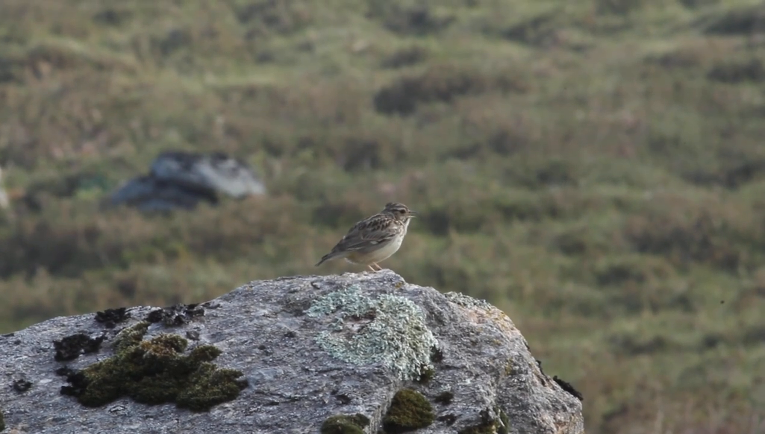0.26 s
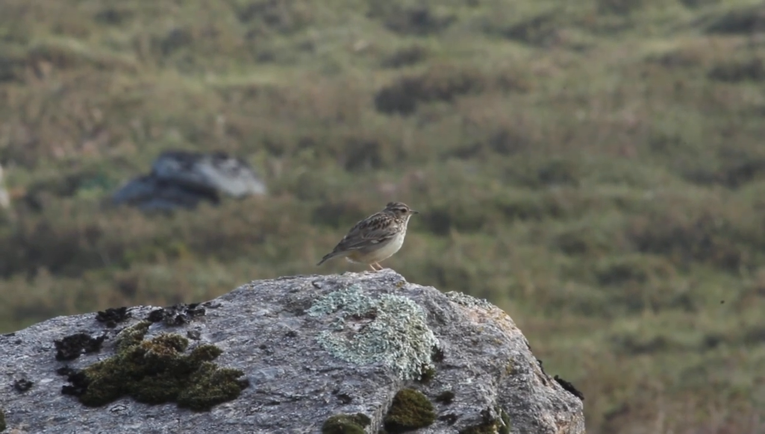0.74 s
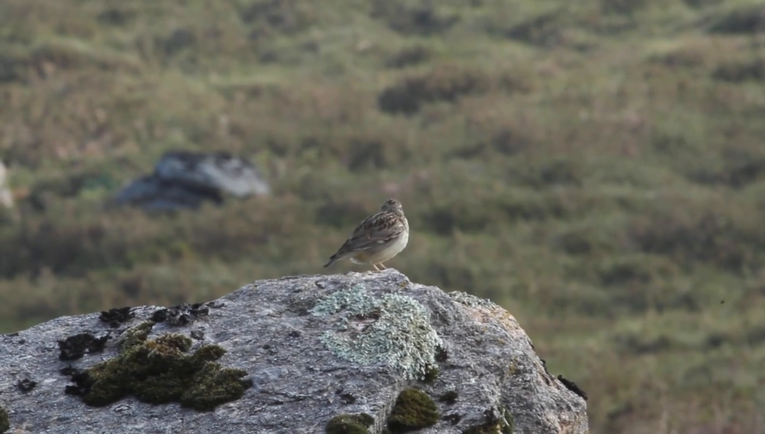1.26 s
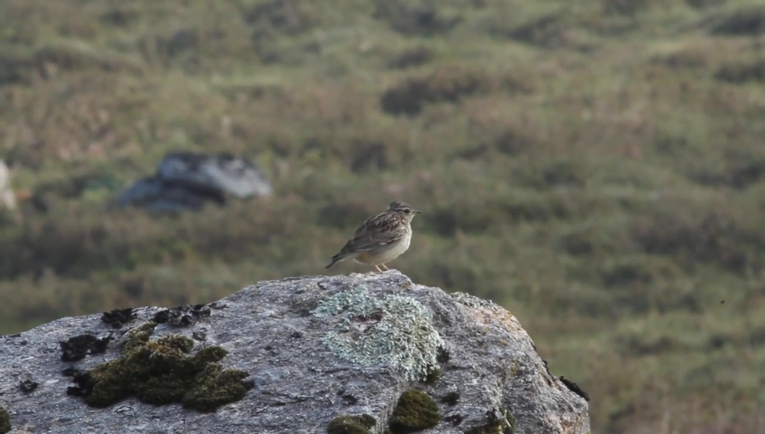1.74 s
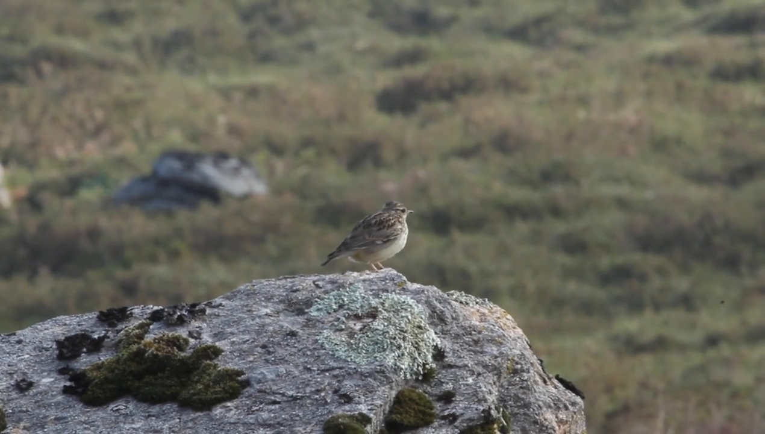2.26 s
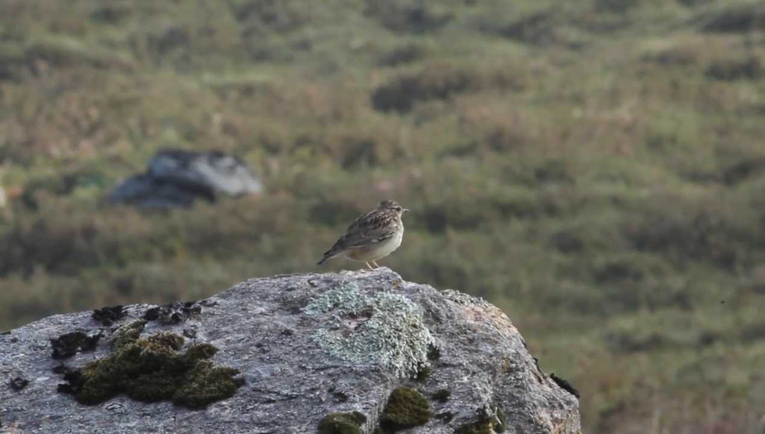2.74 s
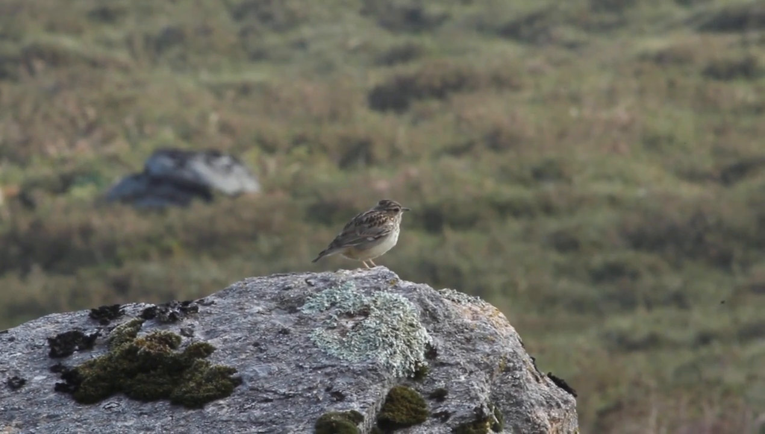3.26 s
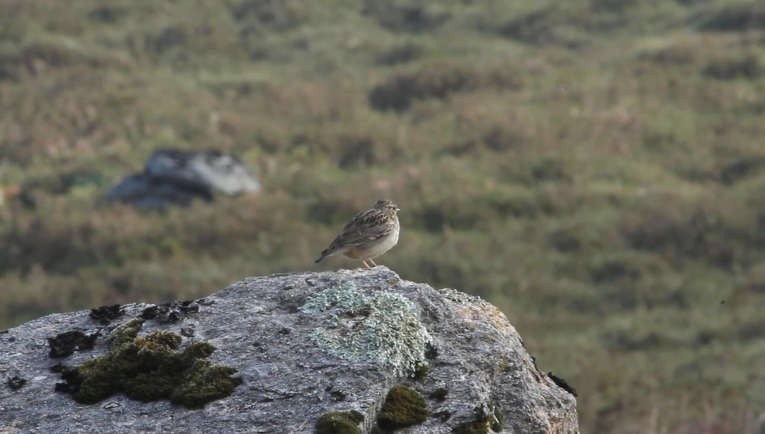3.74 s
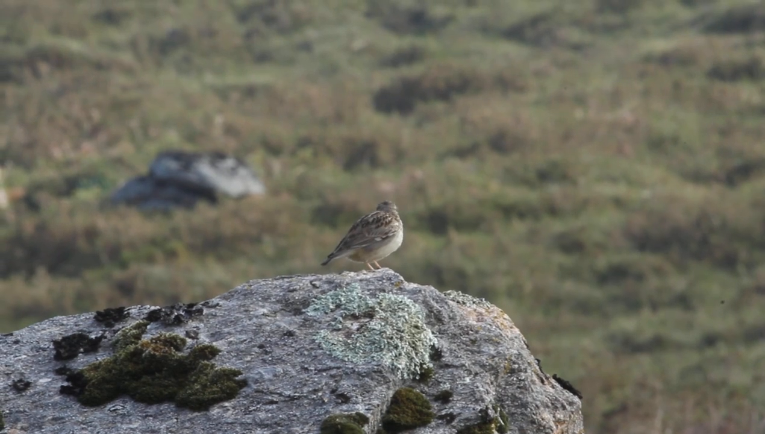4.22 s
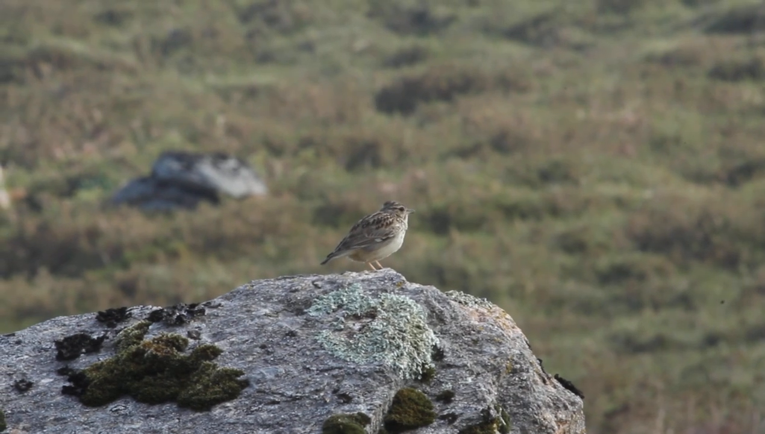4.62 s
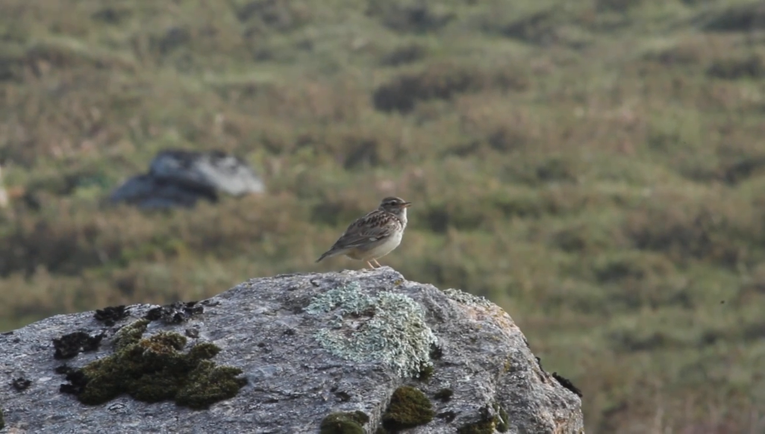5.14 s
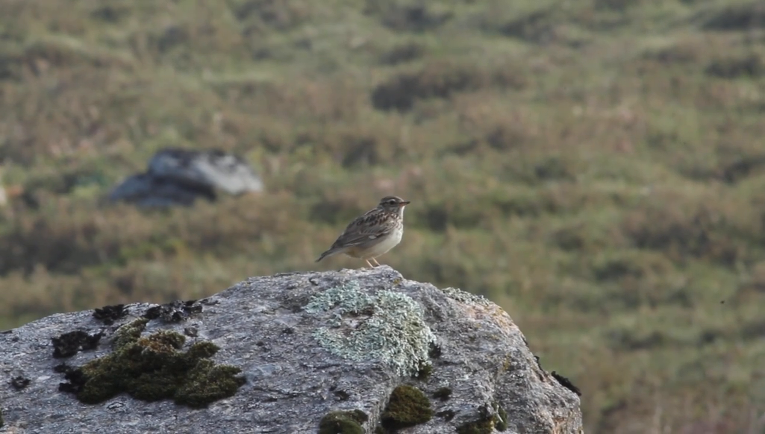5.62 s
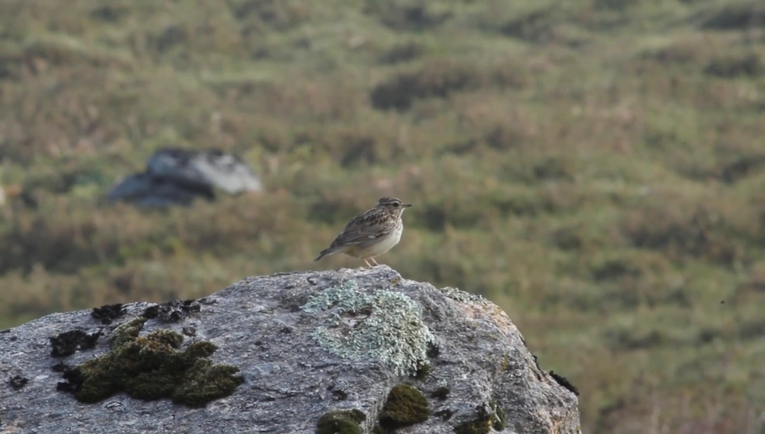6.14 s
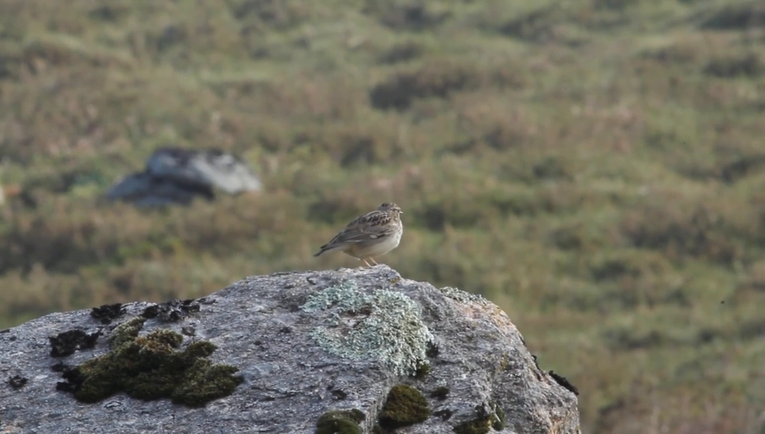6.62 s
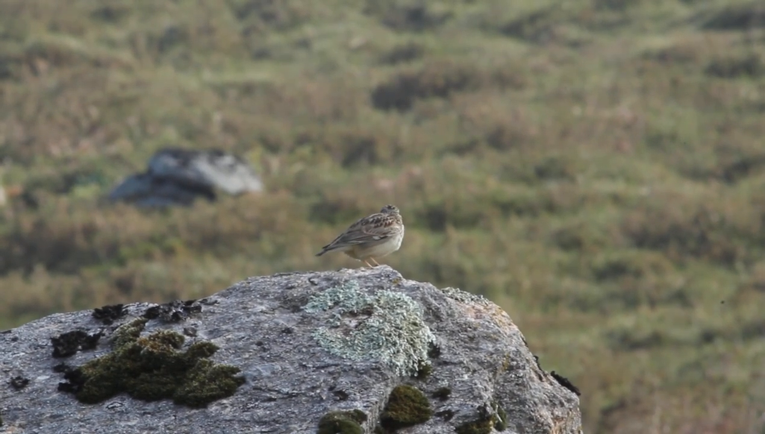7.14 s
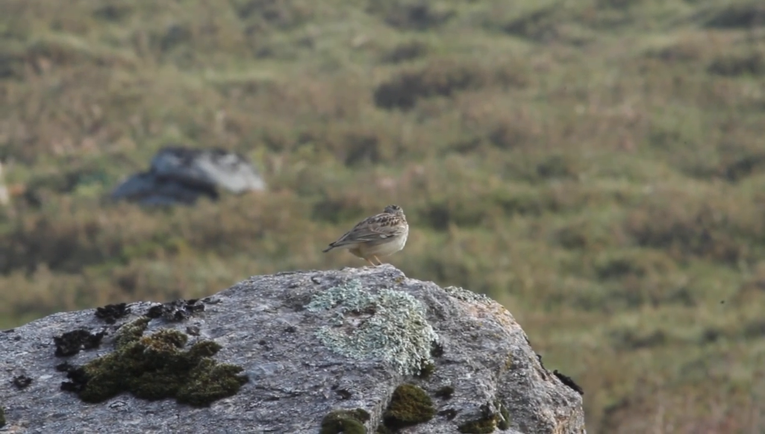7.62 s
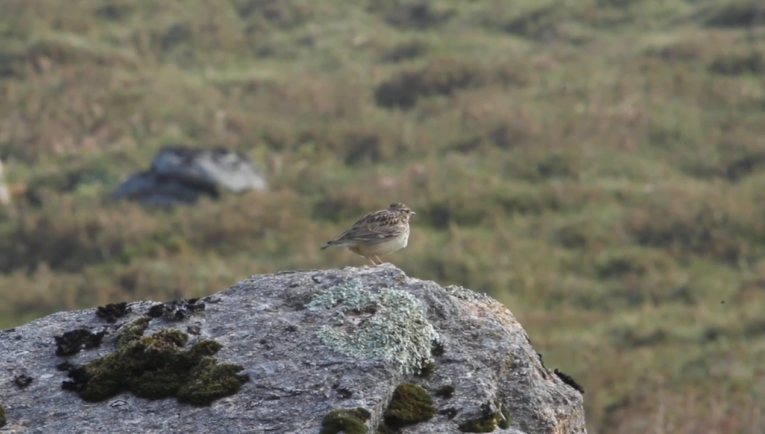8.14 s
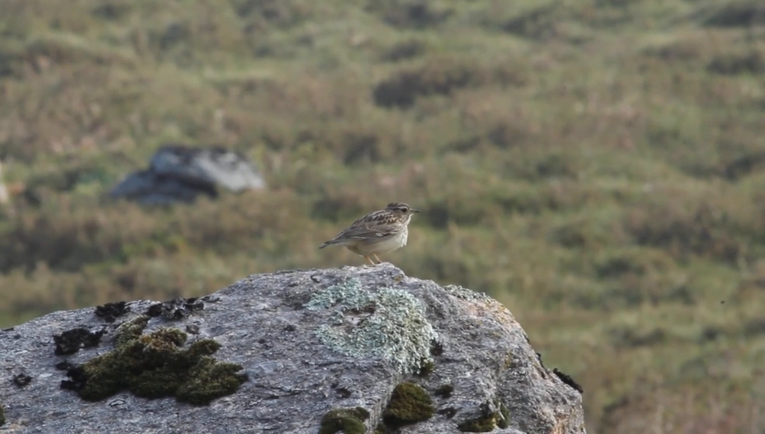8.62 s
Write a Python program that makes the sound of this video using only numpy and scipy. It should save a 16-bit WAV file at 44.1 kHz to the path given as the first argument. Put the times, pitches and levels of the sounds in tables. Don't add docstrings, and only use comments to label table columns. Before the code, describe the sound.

On an open hillside a lark sings three clear whistled syllables, each flicking upward, holding and dropping off. After a pause with tiny far twitters and a neighbour's quick rising calls, it sings seven falling warbles that grow louder and sink in pitch. Faint calls follow. Rock and slope return a light echo. Close to the microphone, the camera drive hums low and rattles unevenly with small knocks, over soft hiss.

```python
import sys
import numpy as np
from scipy import signal
from scipy.fft import rfft, irfft
from scipy.io import wavfile
from scipy.ndimage import uniform_filter1d

SR = 44100
rng = np.random.default_rng(int(sys.argv[2]) if len(sys.argv) > 2 else 0)


def bounce(signal):
    frames = np.transpose(np.atleast_2d(signal))
    limited = np.clip(frames, -1, 1)
    pcm = np.round(limited * 32767).astype(np.int16)
    wavfile.write(sys.argv[1], SR, pcm)


def nominal_scale(level):
    x = np.asarray(level, float) / 20
    return 10 ** x


N = 391158


def level(x, db):
    return x * nominal_scale(db) / np.sqrt(np.mean(x ** 2))


def track(rows):
    return np.interp(np.arange(N) / SR, *np.transpose(rows))


def ring(x, hz, width):
    return signal.lfilter(*signal.iirpeak(hz, hz / width, fs=SR), x)


def walk(rate):
    k = int(SR / rate)
    steps = np.repeat(rng.standard_normal(N // k + 1), k)
    return 1.093 * uniform_filter1d(uniform_filter1d(steps, k), k)[:N]


def add(out, start_s, hz, db, shape, overtones):
    full_voice_db = -24
    phase = 2 * np.pi * np.cumsum(hz) / SR
    tone = np.sin(phase)
    for k, part_db, loss in overtones:
        tone = tone + nominal_scale(part_db + loss * (db - full_voice_db)) * np.sin(k * phase)
    i = int(start_s * SR)
    out[i:i + len(hz)] += (np.sqrt(2) * nominal_scale(db) * shape * tone)[:N - i]


def bent(rows, midway):
    return [(s, length_s, a, a + midway * (b - a), b, db) for s, length_s, a, b, db in rows]


def glides(rows, edge, overtones, hold=0):
    out = np.zeros(N)
    for start_s, length_s, *hz, db in rows:
        u = np.linspace(0, 1, int(length_s * (1 + hold) * SR))
        curve = np.polyfit([0, .5, 1], hz, 2)
        pitch = np.polyval(curve, np.minimum(u * (1 + hold), 1 - hold / 2))
        shape = np.sin(np.pi * u ** edge[0]) ** edge[1]
        add(out, start_s, pitch, db, shape, overtones)
    return out


def lark():
    # start t/s, length/s, f/Hz at start, f/Hz at end, level/dB
    lead_in = [
        (0, 0.037, 2340, 2270, -48.5),
        (.262, 0.047, 2215, 2310, -52),
        (.545, .044, 2090, 2170, -48.5),
    ]
    side = glides(bent(lead_in, 0.72), (1.1, .9), []) + spurs(np.zeros(N))
    voice = side + hooks(np.zeros(N)) + warbles(np.zeros(N))
    throat_hz, throat_width, throat_db = 5600, 500, -1
    throat = ring(ring(voice, throat_hz, throat_width), throat_hz, throat_width)
    voice = voice + nominal_scale(throat_db) * throat
    return voice * nominal_scale(.5 * walk(220) + .2 * walk(90))


def sing(out, t, hz, db):
    # multiple of the pitch, level/dB at full voice, extra dB lost per dB sung softer
    overtones = [
        (2, -45, -.4),
        (3, -39, 1.1),
    ]
    hz, db = (uniform_filter1d(c, size=70, mode="nearest") for c in (hz, db))
    shape = signal.windows.tukey(len(t), 0.0034 / (t[-1] - t[0]))
    add(out, t[0], hz, db, shape, overtones)


def hooks(out):
    # voice break t/s, held f/Hz, flick f/Hz, level/dB, effort sag/dB
    syllables = [
        (.093, 3420, 4220, -30, -0.5),
        (0.367, 3407, 4480, -29.5, -2),
        (.65, 3302, 4420, -30.5, -6),
    ]
    # t/s from break, f/Hz, level/dB relative to syllable, share of sag
    run_up = [(-.055, 2420, -27, 0.014), (-.051, 2640, -14, 0.17), (-.046, 2790, -13, .7),
              (-.034, 3050, -4, 0.79), (-.022, 3230, -5, 0.043), (-.01, 3340, -0.5, .1),
              (-.004, 3520, -0.5, 0.41), (0, 3280, -1, 0.039)]
    # t/s from break, pitch over held pitch, level/dB relative to syllable, share of sag
    settle = [(.013, 1.16, 2.5, .8), (.025, 1.08, 0, 1.1), (.039, 1.03, -4, 0.96), (.062, 1.001, -5, 0.53),
              (0.089, 1.005, -2.5, 0.47), (.1125, 1.066, .1, -0.18), (0.115, 0.99, -7, 0),
              (.119, 0.886, -8.5, 0.12), (0.1235, 0.76, -30, 0.096)]
    catch_s, catch_hz, catch_db = 0.00243, 3330, -19
    flick_s, flick_db = 0.0084, 5
    for s, held_hz, flick_hz, db, sag_db in syllables:
        after = [(0, catch_hz, catch_db, 0), (catch_s, catch_hz, catch_db, 0), (flick_s, flick_hz, flick_db, 1.2)]
        after += [(a, ratio * held_hz, c, d) for a, ratio, c, d in settle]
        for rows in run_up, after:
            at, hz, relative_db, share = np.transpose(rows)
            t = np.arange(at[0], at[-1], 1 / SR)
            effort = db + np.interp(t, at, relative_db + share * sag_db)
            sing(out, s + t, np.interp(t, at, hz), effort)
    return out


def warbles(out):
    # t/s, shoulder f/Hz, level/dB, bend of the climb
    starts = [(3.775, 3550, -61, 0.99), (4.055, 3780, -50, .55), (4.328, 3460, -49.5, 1.2),
              (4.582, 3360, -40.5, 1.3), (4.85, 3250, -43, 1.51), (5.12, 3200, -38.5, 2),
              (5.396, 3150, -35, 3.2)]
    # t/s, f/Hz, loudest this much later/s, level/dB
    crests = [(3.83, 4200, .02, -44), (4.107, 4300, 0.018, -41.5), (4.385, 3930, .012, -36),
              (4.651, 3674, 0.017, -32.5), (4.918, 3574, 0.014, -30.5), (5.192, 3504, 0.003, -23),
              (5.477, 3560, 0.006, -24)]
    # t/s, f/Hz, faintest this much earlier/s, level/dB
    troughs = [(3.897, 3490, 0.03, -62), (4.173, 3400, 0.023, -63), (4.461, 2955, 0.023, -51.5),
               (4.725, 2886, .004, -57), (4.993, 2776, 0.015, -51.5), (5.266, 2734, 0.0069, -45),
               (5.555, 2653, 0.0071, -51)]
    # t/s, f/Hz, loudest this much earlier/s, level/dB, bend of the upturn
    tops = [(3.933, 4060, 0.017, -44, 1.8), (4.204, 3600, 0.016, -39, 2), (4.509, 3330, 0.025, -33, 1.6),
            (4.776, 3270, 0.013, -32, 3), (5.052, 3126, 0.022, -36, 1.44),
            (5.322, 3134, 0.0035, -26.5, 2.7), (5.607, 3003, 0.0082, -28.5, 1.02)]
    fall = [(0, 0.022), (.1, 0.078), (.28, .37), (.67, .82), (.87, .97), (1, 0.98)]
    scoop_s, scoop_from, scoop_db = .009, .6, -17
    fade_db_s, release_s, release_db, fail_bend = 300, 0.016, -17, 1.1
    swell_share = 0.68
    for k, (start, crest, trough, top) in enumerate(zip(starts, crests, troughs, tops)):
        start_s, shoulder_hz, start_db, climb_bend = start
        crest_s, crest_hz, loud_later_s, crest_db = crest
        trough_s, trough_hz, faint_earlier_s, trough_db = trough
        top_s, top_hz, loud_earlier_s, top_db, upturn_bend = top
        shoulder_s = start_s + scoop_s
        t = np.arange(start_s if k else shoulder_s, top_s + release_s, 1 / SR)

        def done(a, b):
            return np.clip((t - a) / (b - a), 0, 1)

        hz = shoulder_hz * (1 - (1 - scoop_from) * (1 - done(start_s, shoulder_s)) ** 1.31)
        hz += (crest_hz - shoulder_hz) * done(shoulder_s, crest_s) ** climb_bend
        hz += (trough_hz - crest_hz) * np.interp(done(crest_s, trough_s), *np.transpose(fall))
        hz += (top_hz - trough_hz) * done(trough_s, top_s) ** upturn_bend

        loud_s, faint_s = crest_s + loud_later_s, trough_s - faint_earlier_s
        upturn_db = top_db + start_db - trough_db
        end_db = upturn_db - fade_db_s * loud_earlier_s
        effort = [(start_s, start_db + scoop_db), (shoulder_s, start_db), (loud_s, start_db), (faint_s, start_db),
                  (top_s - loud_earlier_s, upturn_db), (top_s, end_db), (top_s + release_s, end_db + release_db)]
        failing = done(loud_s, faint_s) ** fail_bend
        swell = done(shoulder_s, loud_s) ** (max(climb_bend, 1) ** swell_share) - failing
        db = np.interp(t, *np.transpose(effort))
        db = db + (crest_db - start_db) * swell + (trough_db - start_db) * failing
        sing(out, t, hz, db)
    return out


def spurs(out):
    # t/s, level/dB
    times = [
        (4.578, -57),
        (4.841, -52),
        (5.114, -51),
        (5.388, -49.5),
    ]
    length_s, held_hz, rise_hz, bend = .014, 3660, 1150, 5.6
    u = np.linspace(0, 1, int(length_s * SR))
    for s, db in times:
        add(out, s, held_hz + rise_hz * u ** bend, db, np.sin(np.pi * u ** 0.92) ** .6, [])
    return out


def neighbour():
    # start t/s, length/s, top f/Hz, level/dB
    answers = [(3.123, 0.022, 3180, -44), (3.214, 0.023, 3140, -45.5), (3.306, .03, 3400, -47.5),
               (3.393, 0.027, 3200, -49), (6.715, 0.022, 3200, -51), (6.798, 0.025, 3170, -49.5),
               (7.438, .024, 3070, -55.4), (7.528, 0.026, 3220, -49.5), (7.616, 0.03, 3380, -47.5),
               (7.71, 0.027, 3080, -47.5), (7.8, 0.027, 3090, -46.5), (8.682, 0.02, 2300, -53),
               (8.754, .018, 2210, -55), (8.83, 0.019, 2280, -53.5)]
    sweep_per_s, sweep_midway = 15.2, 0.63
    perch_up_s, notch_hz, notch_width = 4, 2830, 320
    rows = [(s, length_s, hz * (1 - sweep_per_s * length_s), hz, db) for s, length_s, hz, db in answers]
    calls = glides(bent(rows, sweep_midway), (1.3, .55), [(2, -24, 0)], hold=.13)
    calls = calls * nominal_scale(1.8 * walk(260))
    low = np.arange(N) < perch_up_s * SR
    calls = calls - .85 * low * ring(calls, notch_hz, notch_width)
    return calls + nominal_scale(-17) * np.roll(calls, int(.011 * SR))


def twitter():
    # start t/s, length/s, f/Hz at start, f/Hz at end, level/dB
    chirps = [(0, .022, 3720, 3600, -57), (.03, .033, 3720, 3620, -58), (.029, 0.0099, 3000, 2600, -51),
              (.132, .016, 5830, 6050, -66), (.193, 0.033, 4860, 4820, -62), (.575, .035, 5790, 5800, -68),
              (.87, .035, 6050, 6240, -67), (1.365, .035, 5480, 5350, -68), (1.43, .035, 5180, 5100, -71),
              (1.575, .017, 4700, 5020, -66.5), (1.84, 0.028, 4860, 4530, -68),
              (1.865, .014, 4680, 5000, -64), (6.13, .032, 3920, 3980, -66), (6.23, .084, 4900, 4300, -63),
              (6.312, .026, 5750, 4940, -60), (6.278, 0.042, 6750, 5700, -65),
              (6.325, .05, 4660, 4300, -65), (6.378, .032, 6020, 6960, -66), (6.478, .015, 4390, 4370, -64),
              (6.503, .017, 3920, 3490, -61), (6.57, .024, 5990, 6550, -69),
              (6.755, .048, 4160, 3600, -61.5), (7.948, .036, 4280, 4040, -67),
              (8.688, .014, 3640, 4430, -63)]
    return glides(bent(chirps, 0.89), (1.0, .7), [])


def hillside(x):
    # delay t/s, level/dB
    echoes = [
        (.0021, -22),
        (.0085, -21),
        (.0148, -16.5),
        (.0162, -22),
        (.0275, -26),
    ]
    slope_t60_s, slope_db = .6, -24.5
    bank_s, bank_spread_s, bank_db = .066, .016, -27
    t = np.arange(SR // 2) / SR
    scatter = rng.standard_normal((2, len(t))) * (rng.random((2, len(t))) < 240 / SR)
    slope = scatter[0] * nominal_scale(-60 * t / slope_t60_s) * (1 - np.exp(-t / 0.01))
    bank = scatter[1] * np.exp(-((t - bank_s) / bank_spread_s) ** 2)
    response = (level(slope, slope_db) + level(bank, bank_db)) / np.sqrt(len(t))
    for delay_s, db in echoes:
        response[int(delay_s * SR)] += nominal_scale(db)
    return x + signal.fftconvolve(x, ring(response, 3500, 1700))[:N]


def camera():
    # t/s, level/dB
    hum = [(0, -59), (.12, -52), (.6, -51), (1.2, -52), (2.3, -52), (2.72, -50), (3.1, -53.5), (3.7, -50),
           (4.1, -51.5), (5.24, -50.5), (6.4, -52), (6.8, -50), (7.4, -53), (7.8, -51.5), (8.87, -53.5)]
    # t/s, peak level/dB
    knocks = [(.882, -43), (1.122, -42), (1.522, -40.5), (1.622, -40.5), (2.355, -44.5), (2.819, -42),
              (3.161, -45), (3.381, -41.5), (3.485, -45), (3.635, -48), (3.72, -41.5), (4.332, -41.5),
              (4.555, -43.5), (4.914, -41), (4.966, -43.5), (5.555, -43), (5.682, -41.5), (5.859, -46),
              (6.016, -45.5), (6.103, -47), (6.599, -41), (6.746, -44), (6.867, -39), (6.922, -42.5),
              (6.999, -43), (7.258, -45), (7.617, -43), (7.775, -45), (7.905, -44.5), (8.336, -44.5)]
    # f/Hz, width/Hz, level/dB
    modes = [(142, 19, -16), (187, 133, -16.5), (290.5, 30, -7.5), (387.4, 50.5, -11), (492.7, 30.2, -0.5),
             (572, 46, -4), (628, 40.6, -4.5), (689.5, 56.3, -6), (842, 126, -15.5), (1100, 360, -24),
             (1506, 81, -12.5), (1560.5, 106, -15)]
    drive_hz, drive_db, ticks_per_s = 134.4, -66.5, 1100
    chance = rng.random((N, 2)).T
    load = walk(14) + .8 * walk(7)
    unsteady = load - uniform_filter1d(load, size=SR // 2)
    size_db = np.minimum(-2.5 * np.log(1 - chance[1]), 8.5) + unsteady
    ticks = -nominal_scale(size_db) * (chance[0] < ticks_per_s / SR)
    ticks = level(ticks - ticks.mean(), 0) * nominal_scale(track(hum))
    for s, db in knocks:
        i = int((s - .002) * SR)
        ticks[i - int(.012 * SR):i] *= .35
        ticks[i] -= nominal_scale(db + 21.5)
    body = np.zeros(N)
    for k, (hz, width, db) in enumerate(modes):
        body += (-1) ** k * nominal_scale(db) * ring(ticks, hz, width)
    pitch = drive_hz + 3.58 * walk(14)
    tone = np.sin(2 * np.pi * np.cumsum(pitch) / SR) * nominal_scale(2.4 * walk(6.4))
    return nominal_scale(25.5) * body + level(tone, drive_db)


def wind():
    # t/s, length/s, level/dB
    puffs = [
        (5.8, 0.035, -68),
        (5.933, 0.071, -59),
        (6.11, 0.091, -65),
        (6.23, .04, -69),
        (6.33, .035, -72),
    ]
    # t/s, peak level/dB
    bumps = [
        (8.432, -52),
        (8.535, -58),
        (8.722, -55),
    ]
    bump_s = 0.0043
    t = np.arange(N) / SR
    rumble = level(ring(ring(rng.standard_normal(N), 42, 50), 48, 110), 0)
    gusts = sum(nominal_scale(db) * np.exp(-((t - s) / length_s) ** 2) for s, length_s, db in puffs)
    slaps = np.zeros(N)
    for s, db in bumps:
        u = (t - s) / bump_s
        slaps += nominal_scale(db) * 2 * u * np.exp(-u ** 2)
    return slaps + rumble * gusts


def air():
    # f/Hz, level/dB per Hz
    colours = [(15, -48), (28, -17), (80, -3), (200, 4.5), (600, -1), (1200, -3), (1900, -7), (3500, -9.5),
               (6750, -15), (11000, -19.5), (15600, -26.5)]
    hz, db = np.transpose(colours)
    colour = nominal_scale(np.interp(np.log(np.fft.rfftfreq(N, 1 / SR) + 1), np.log(hz), db))
    hiss = irfft(rfft(rng.standard_normal(N)) * colour, N)
    return level(hiss, -56) * nominal_scale(0.056 * walk(6.5))


def scene():
    birds = lark() + neighbour() + twitter()
    return (hillside(birds) + camera() + wind() + air())[None]


def top_cut(x):
    return signal.sosfilt(signal.butter(12, 15710, fs=SR, output="sos"), x)


def record(dry):
    top_hz = 15760
    dull = signal.sosfilt(signal.ellip(10, .2, 60, top_hz, fs=SR, output="sos"), dry)
    return top_cut(dull)


dry = scene()
out = record(dry)
bounce(out)
```